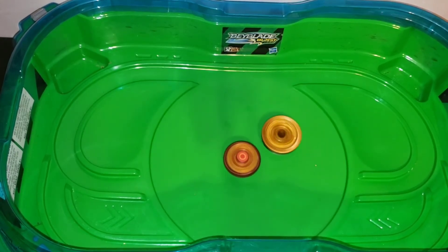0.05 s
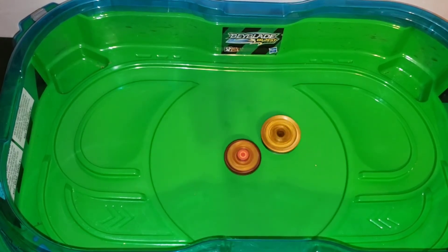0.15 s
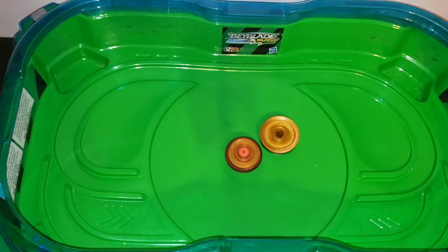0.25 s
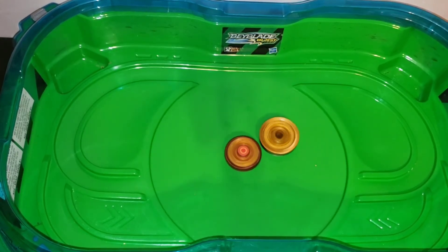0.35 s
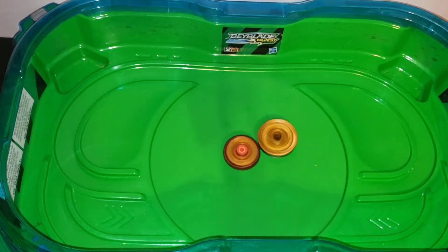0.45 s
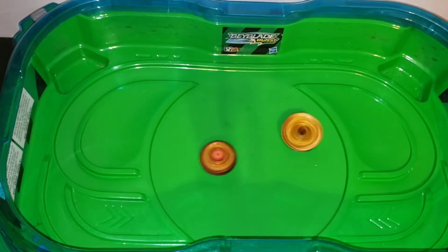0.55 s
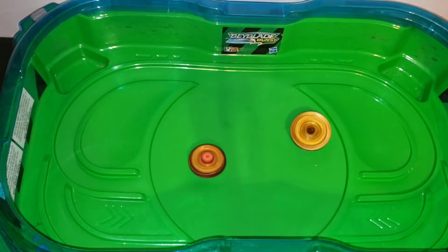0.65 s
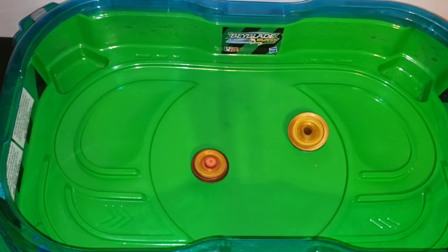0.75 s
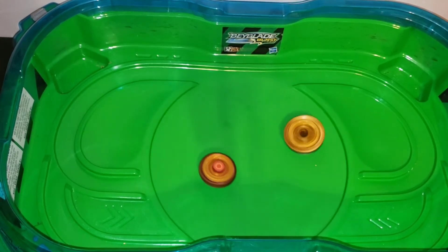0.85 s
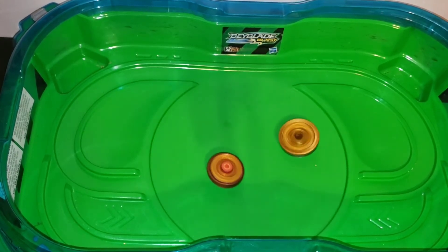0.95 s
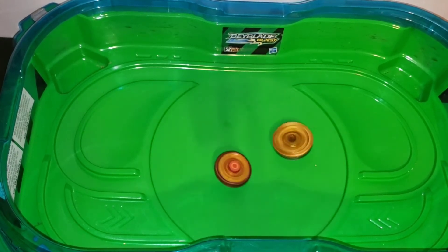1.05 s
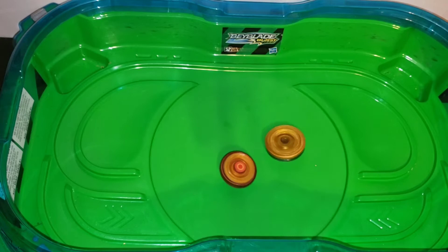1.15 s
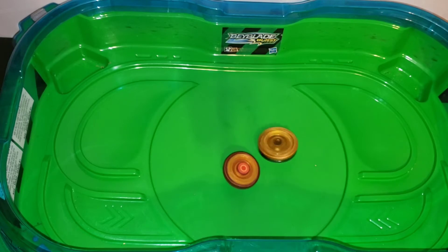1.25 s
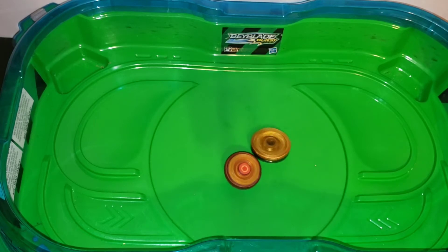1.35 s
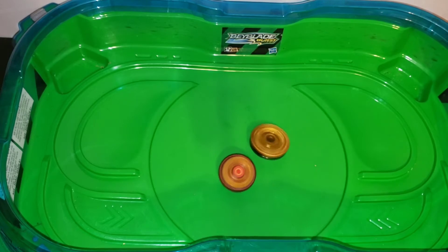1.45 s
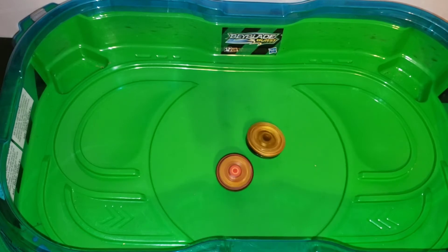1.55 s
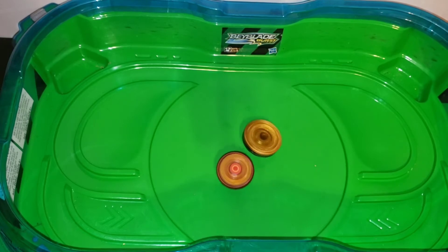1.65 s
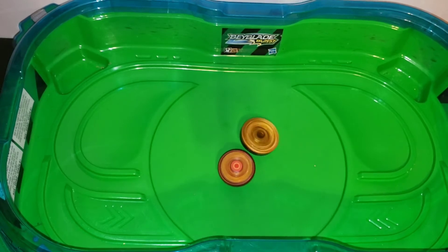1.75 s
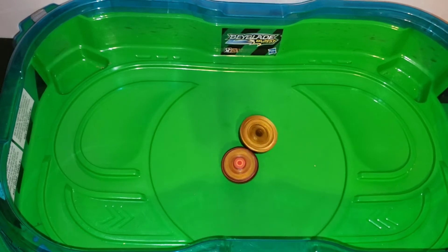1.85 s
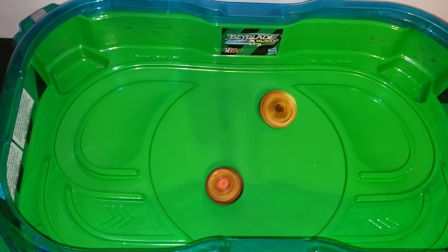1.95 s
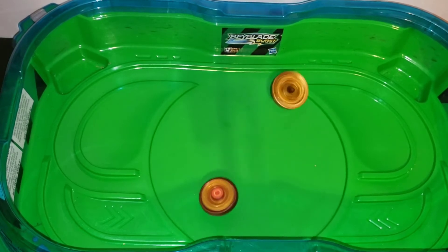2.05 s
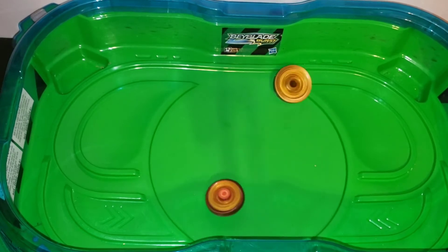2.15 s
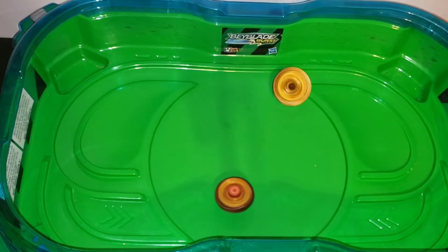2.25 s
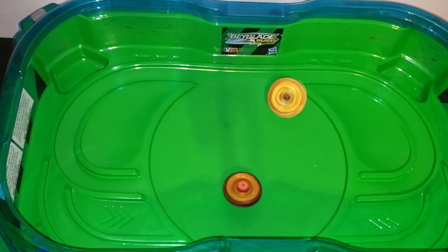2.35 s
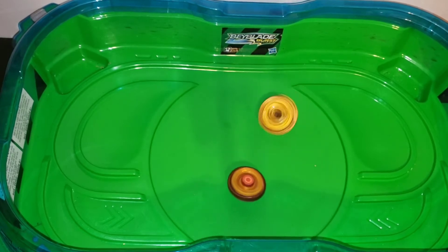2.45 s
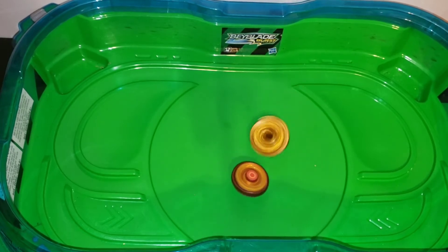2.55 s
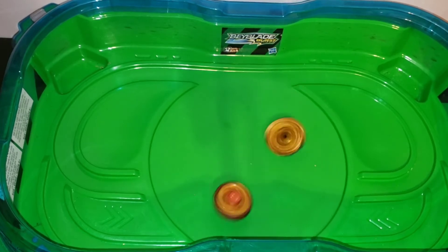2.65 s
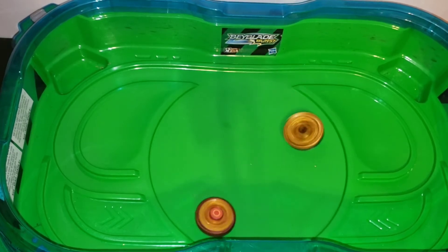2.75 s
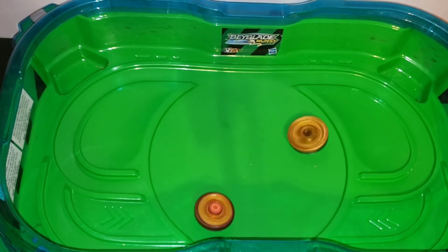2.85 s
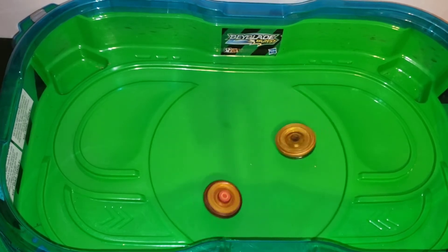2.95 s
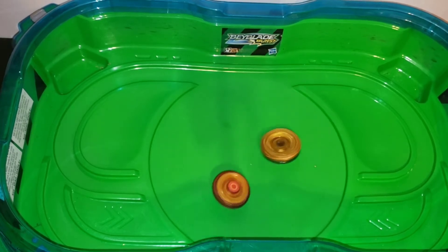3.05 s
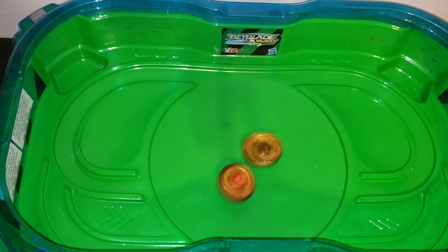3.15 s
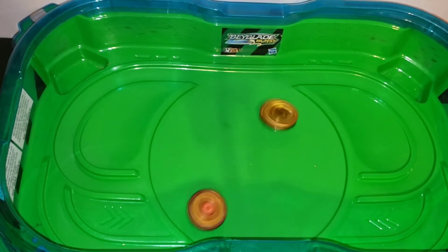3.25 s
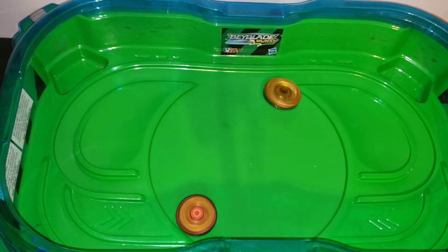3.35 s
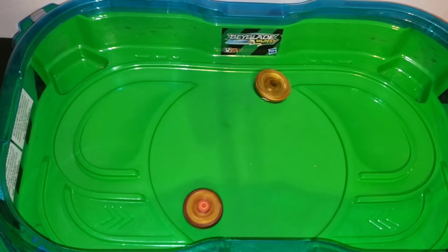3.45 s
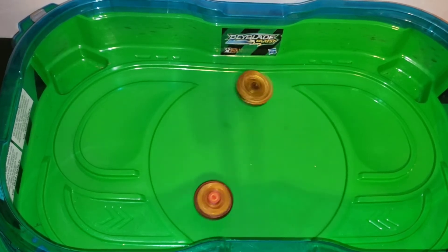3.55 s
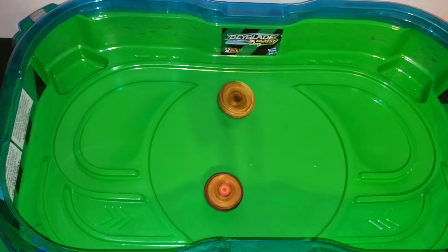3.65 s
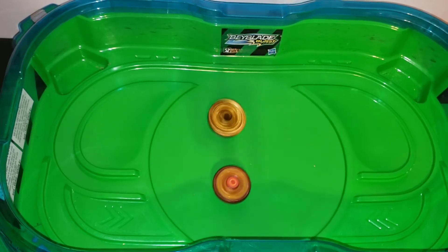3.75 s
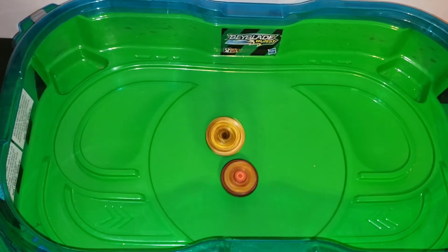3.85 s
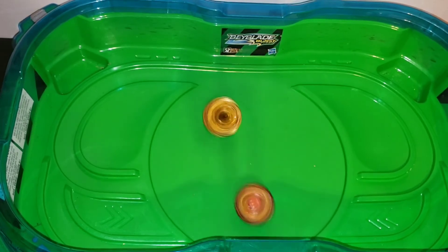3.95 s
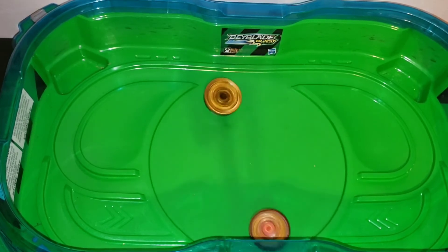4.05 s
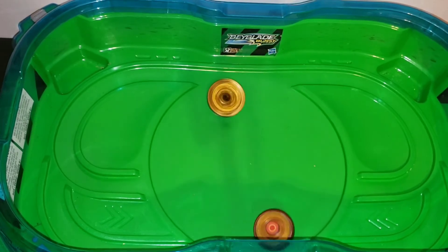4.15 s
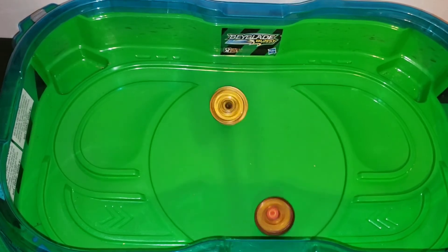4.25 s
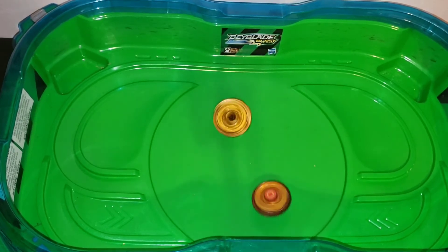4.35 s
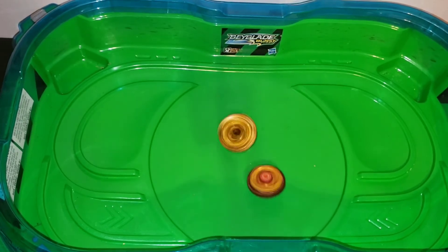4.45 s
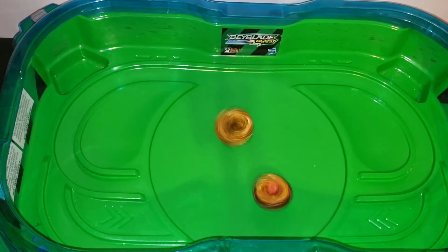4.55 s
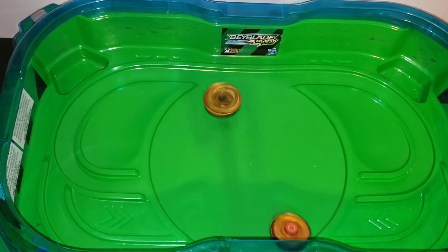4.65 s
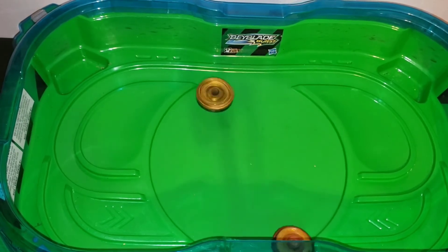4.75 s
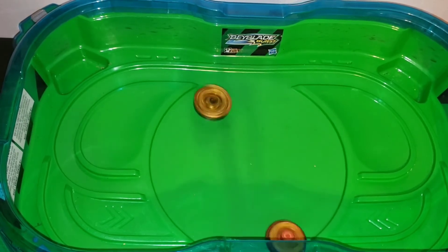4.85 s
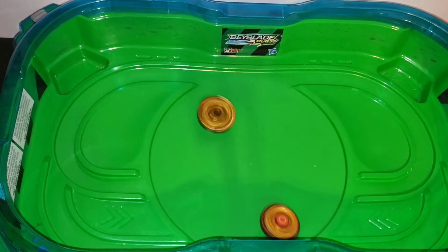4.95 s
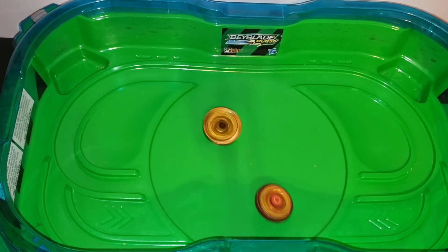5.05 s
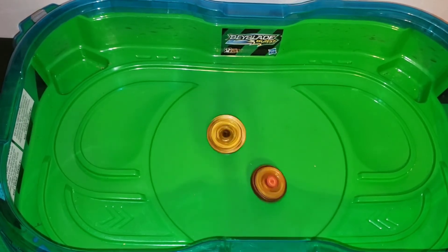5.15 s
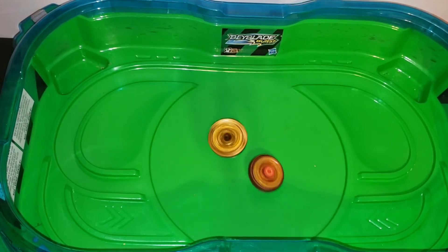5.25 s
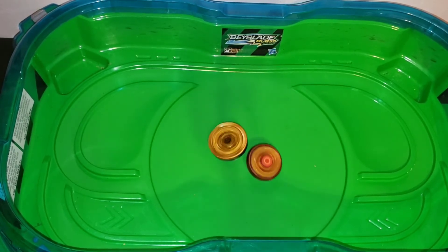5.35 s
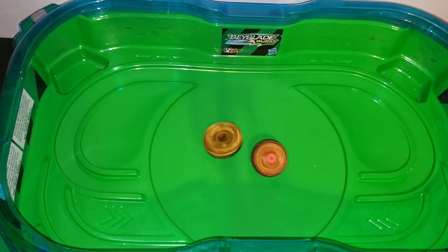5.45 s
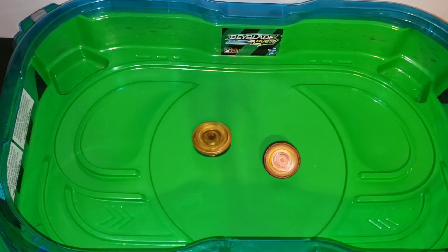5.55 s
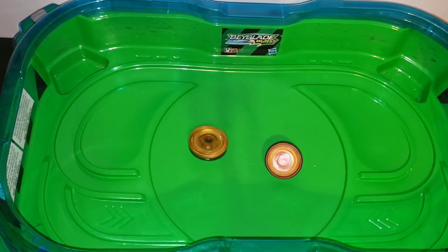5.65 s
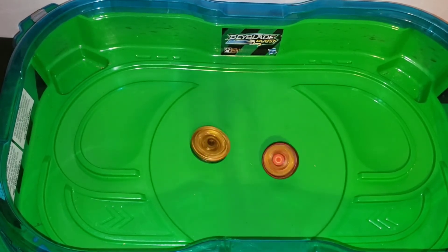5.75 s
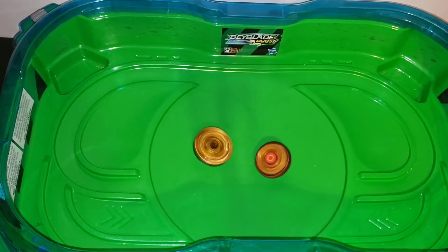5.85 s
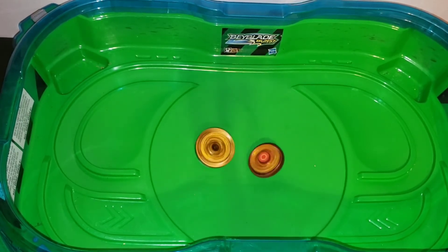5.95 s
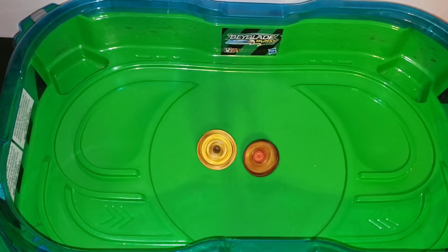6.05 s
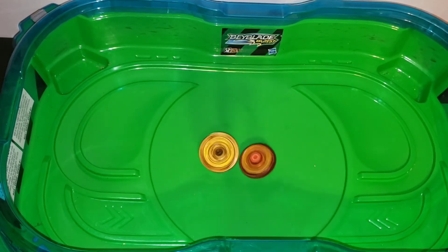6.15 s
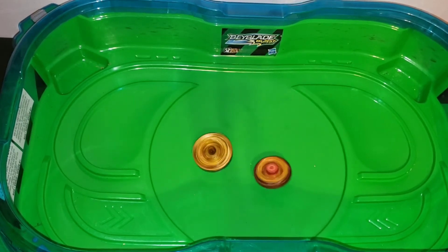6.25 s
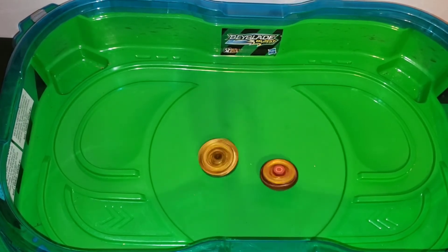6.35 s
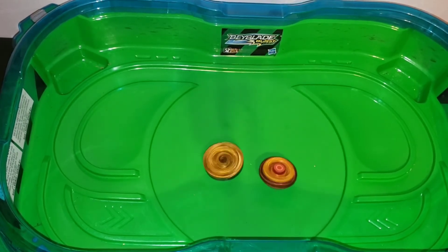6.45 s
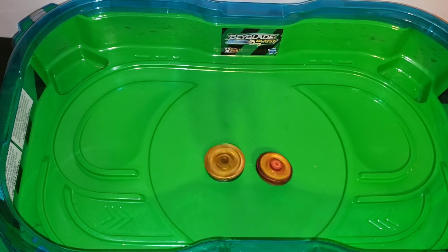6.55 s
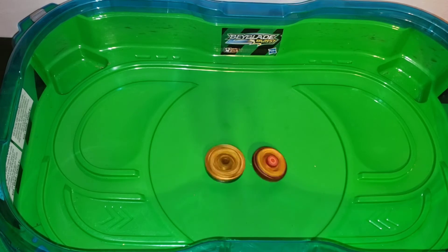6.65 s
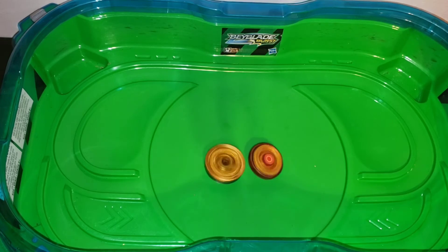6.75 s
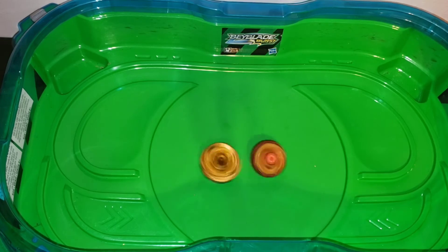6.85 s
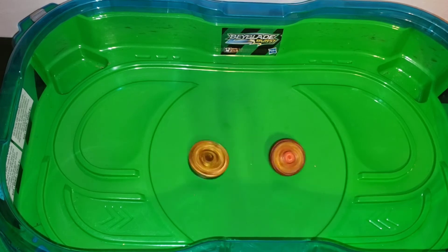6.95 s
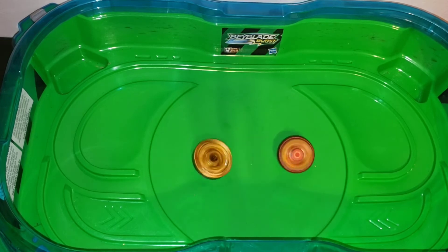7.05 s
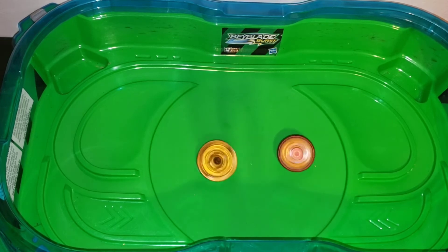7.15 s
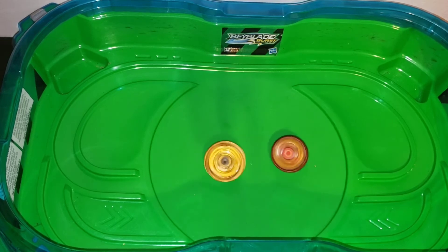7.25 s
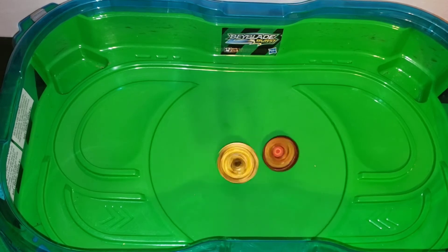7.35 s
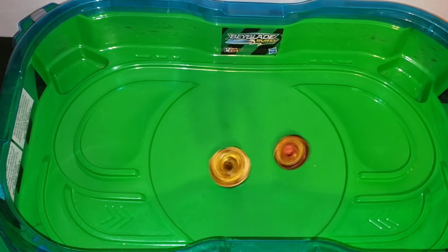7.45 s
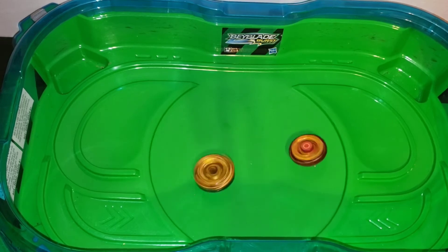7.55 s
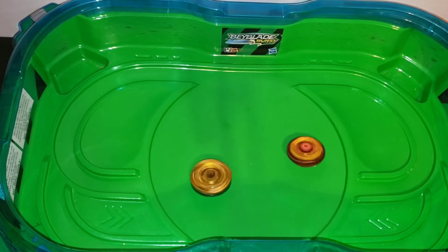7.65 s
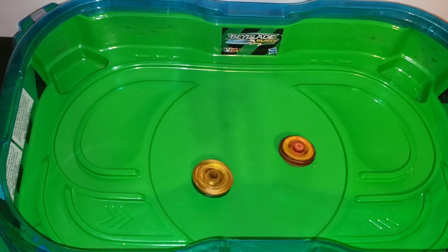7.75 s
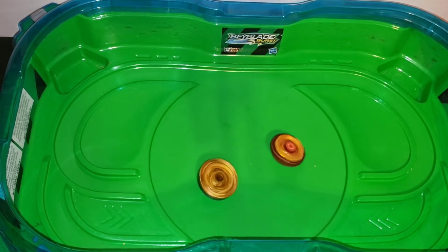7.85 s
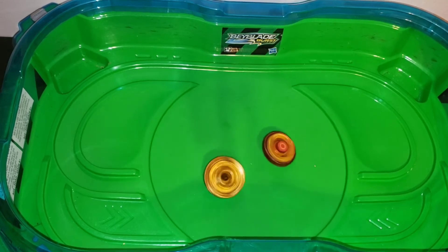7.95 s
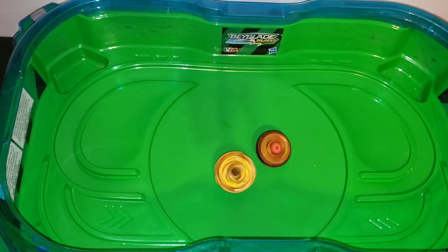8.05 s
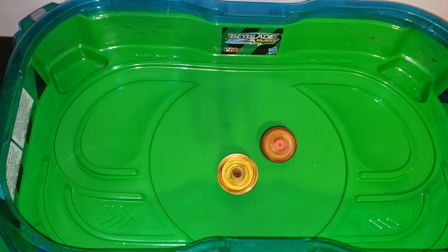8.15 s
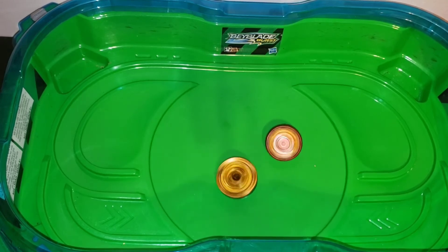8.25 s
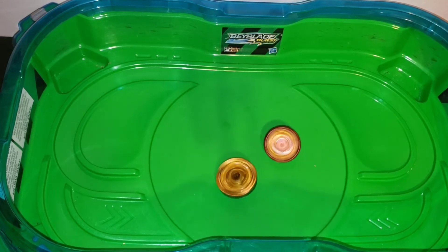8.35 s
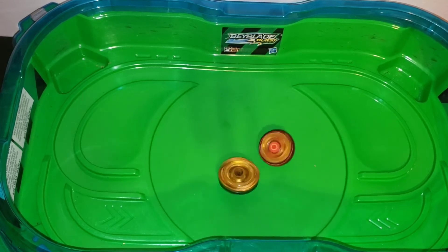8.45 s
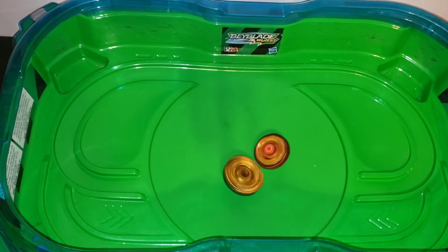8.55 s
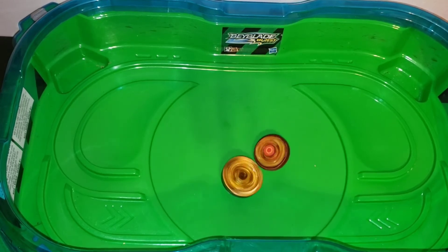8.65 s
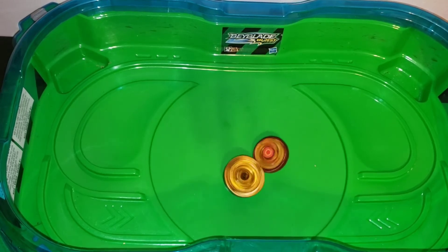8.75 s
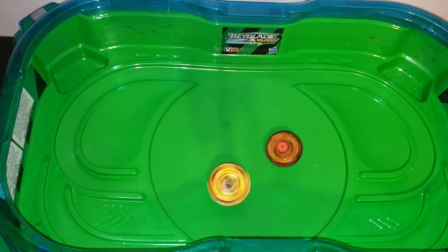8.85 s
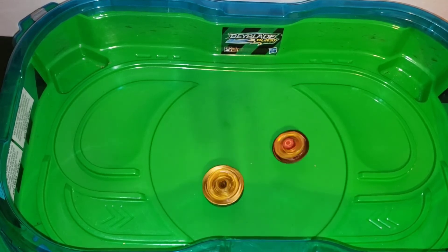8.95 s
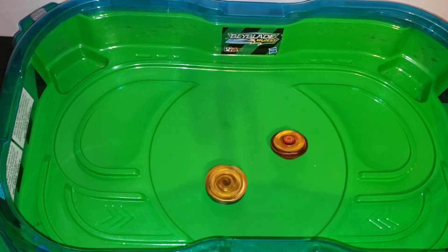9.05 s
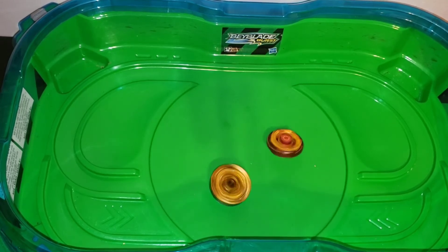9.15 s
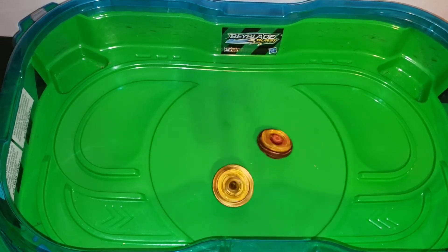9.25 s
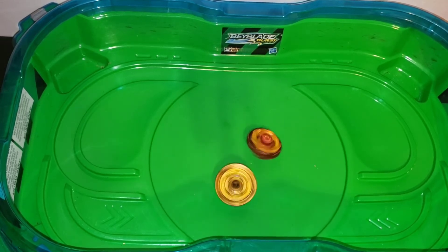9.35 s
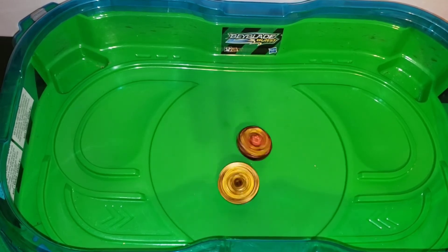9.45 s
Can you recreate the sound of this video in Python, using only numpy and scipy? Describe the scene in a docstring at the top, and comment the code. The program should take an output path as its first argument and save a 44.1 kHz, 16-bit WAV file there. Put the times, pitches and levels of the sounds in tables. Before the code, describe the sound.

Sharp ringing clacks and rapid plastic rattles punctuate the steady hum of two toy tops battling in a plastic arena.

```python
"""Sharp clacks, quick drumming and a steady whir: two spinning tops battle in a thin plastic bowl.
Each time their metal rims meet they clack and ring. A tilted top then wobbles and slaps the bowl's
floor until it stands up again. All along, the tops hum because they are a little off balance, and
their tips rub and hiss. A few hard knocks make the plastic boom. It is heard from just above,
in a small room."""
import sys
import numpy as np
from scipy import signal
from scipy.io import wavfile

SR = 44100
rng = np.random.default_rng(int(sys.argv[2]) if len(sys.argv) > 2 else 0)


def master_out(mix):
    """Clip the mix to full scale and print it as 16-bit PCM to the path in sys.argv[1]."""
    frames = np.transpose(np.atleast_2d(mix))
    ceiling = np.clip(frames, -1, 1)
    pcm = np.round(ceiling * 32767).astype(np.int16)
    wavfile.write(sys.argv[1], SR, pcm)


N = 418950
TIME = np.arange(N) / SR
AGE = np.arange(SR // 2) / SR  # seconds since a hit

# Levels in all tables are relative: each layer adds its own gain. rim hits rim: (time [s], level [dB], then on
# top of that level: floor thump [dB], five crack bands [dB], three clinks [dB]; last, lean to the left [left
# louder by 0.4 dB per unit])
RIM_HITS = [(0.3712, -12, -24, -40, -29.5, -4.5, -20, -21.5, -18, -15.5, -11.5, 2),
            (0.5276, -16.5, -13.5, -49, -21, -8, -17, -9.5, -8.5, -3, -9, 0.5),
            (1.429, -12.5, -22, -39, -26.5, -5, -11.5, -12.5, -29, -11.5, -47, 2),
            (1.9237, -9.5, -27, -24, -21, -4, -19.5, -9.5, -16.5, -15, -19, 3),
            (2.6481, -3.5, -27, -30, -13.5, -11, -21.5, -14, -47, -49, -17, 2),
            (3.238, -6, -24.5, -25, -19, -10, -20, -22, -50, -19, -42, 6),
            (3.9829, -11, -24.5, -22, -15, -5, -19.5, -12, -15, -14.5, -16.5, 2.3),
            (4.5978, -11, -11, -13.5, -15.5, -14, -30, -14.5, -89, -31, -16, 7),
            (5.4779, -12, -17.5, -19, -19, -8, -24.5, -18, -34, -19, -16.5, 2.8),
            (6.2187, -23, -38.5, -33.5, -13, -0.5, -21.5, -11.5, -40, -11, -31, 5.5),
            (6.923, -10, -23.5, -28.5, -18.5, -5, -25.5, -17.5, -24, -22, -21, 3.6),
            (7.489, -9, -30.5, -43.5, -26.5, -3.5, -15.5, -13.5, -47, -15.5, -33, 0.5),
            (8.1907, -21, -15, -29, -26, -6, -36, -17.5, -29, -9.5, -19.5, 0.55),
            (8.6404, -14.5, -15, -20, -20.5, -6, -26, -20, -22, -19, -33, 1.5),
            (8.8208, -15.5, -15, -15, -23, -10, -21, -18.5, -24, -21, -37, 2.5)]
# spells of wobbling: (first slap [s], last slap [s], slaps [count], speed-up [share], thump at the start,
# middle and end [dB], then on top of the thump: clatter [dB], scrape [dB], fast hum [dB], slow hum [dB])
WOBBLE_SPELLS = [(0.569, 0.654, 3, 0.018, -36, -43, -37, -3.5, -16, -25.5, -7),
                 (0.692, 0.907, 8, .04, -33.5, -34, -44, 1.5, -13.5, -13, -7),
                 (1.445, 1.749, 10, -0.025, -39.5, -36.5, -39, 3.5, -12, -5, -9.5),
                 (1.981, 2.408, 14, 0.07, -38.5, -34, -51, 4.5, -8, 0.5, -6),
                 (2.696, 2.847, 5, 0.11, -26, -30.5, -31.5, 0.5, -11, -16, -4.5),
                 (3.273, 3.475, 7, 0.081, -36, -35.5, -49, 0, -13.5, -8, -12),
                 (3.574, 3.7, 5, .04, -38, -36, -32, -0.5, -11, -10, -26),
                 (4.145, 4.363, 6, 0, -43, -31, -39.5, 4, -14, -25, -5),
                 (4.646, 4.841, 5, 0.021, -32, -28, -35.5, 7, -9, -24, -1.5),
                 (5.505, 5.844, 8, 0.013, -28.5, -27.5, -29, 1, -4.5, -9, -8.5),
                 (5.908, 5.949, 2, 0, -33.5, -53, -35.5, 0, -0.5, -14.5, -3.5),
                 (6.234, 6.37, 4, .1, -24, -28, -32, 3, -7, -17, -15.5),
                 (6.97, 7.114, 4, 0.072, -29, -26.5, -38, 3, -3, -17, -14),
                 (7.154, 7.212, 3, -0.39, -30.5, -37.5, -30, 0.5, -1.5, -22, 0),
                 (7.504, 7.593, 3, 0, -25.5, -23, -29, -0.5, -9.5, -31, -16),
                 (7.957, 8.007, 2, 0, -40.5, -40, -49, -1, 1.5, -23, -10),
                 (8.286, 8.334, 2, 0, -37, -39, -56, 1, 0, -24, -5),
                 (8.368, 8.459, 3, 0.0062, -30.5, -29.5, -36, 0.5, -4.5, -26, -7),
                 (8.532, 8.612, 3, -0.015, -34, -39, -34.5, -2.5, -2.5, -22, -8),
                 (8.674, 8.771, 3, 0, -33, -33, -33.5, 3.5, 0, -7, -12),
                 (8.863, 8.926, 2, 0, -25.5, -41, -29.5, -2.5, -7.5, -22, -15),
                 (9.076, 9.13, 2, 0, -47.5, -52, -65, -3, 4.5, -22, -4),
                 (9.16, 9.248, 3, -0.014, -37, -33, -37, 1.5, -1, -24, 2),
                 (9.332, 9.48, 4, -0.011, -32, -39, -32, 2, -4.5, -8, -3.5)]
# higher notes of the bowl's floor: (pitch [Hz], level [dB], time to fade by 60 dB [s])
FLOOR_NOTES = [(420, -8, .12), (570, -4, .09), (655, -3, .08), (766, -2, .12), (870, -6, .07),
               (1007, -6, .08), (1150, -6, .1), (1430, -7, .07), (1590, -9, .08), (1900, -9, .07)]
# tone of rattling plastic: (frequency [Hz], level [dB])
CLATTER_TONE = [(150, -8), (240, 5), (330, -3.5), (420, -6), (660, 5.5), (900, -0.5), (1600, -6),
                (2400, -8.5), (3500, -12.5), (6000, -24), (16000, -47.5)]
# tone of a rim scraping plastic: (frequency [Hz], level [dB])
SCRAPE_TONE = [(900, -35.5), (2500, -12), (4000, -5), (7000, -5.5), (8800, -15), (12000, -11),
               (16000, -17.5)]


def rim_clacks():
    """The rims' teeth catch for an instant: a crack, a short ring and a push on the floor."""
    # slices of the crack's sound: (low edge [Hz], high edge [Hz])
    crack_bands = [(700, 2000), (2000, 3300), (4400, 7000), (7000, 8600), (8600, 16000)]
    low, high = np.transpose(crack_bands)
    out = np.zeros((2, N))
    for start, db, thump_db, *bands_db, _, _, _, pan in RIM_HITS:
        snap = even_hit(burst(rise_s=.0005, fall_s=.0014, shared=.75))
        chatter = even_hit(burst(rise_s=.003, fall_s=.012, shared=.45))
        strike = even_hit(snap + amp(-3) * chatter + amp(-5.5) * rim_ring())
        tone_db = np.array(bands_db) + 10 * np.log10(SR / 2 / (high - low))  # spread over each band
        tone = [(150, tone_db[0] - 8), *zip(np.sqrt(low * high), tone_db)]
        tone.insert(3, (3800, (tone_db[1] + tone_db[2]) / 2 - 1))  # a small dip among the clinks
        sides = amp(np.array([[.2], [-.2]]) * pan)
        add(out, start, amp(db - 7.5) * colour(strike, tone) * sides)
        add(out, start, amp(db + thump_db - 2) * floor_thump())
    return out


def rim_ring():
    """Each hit finds new spots on the whirling rims, so their weak notes shift; touching cuts them short."""
    # weak notes of the rims: (pitch [Hz], level [dB], fade time before touching shortens it [s])
    rim_notes = [(2150, -6, .08), (2470, -2, .08), (2665, -1, .12), (3260, 1, .1), (4600, -4, .06),
                 (4860, -2, .08), (6239, -3, .12), (6541, 0, .15), (6993, -1, .15), (7450, -1, .07),
                 (7752, 2, .14), (7924, 0, .17), (9329, -1, .13), (9680, -2, .08), (10490, -3, .12),
                 (11110, -2, .13), (11700, -1, .1), (12500, 0, .15), (13750, -2, .13), (14450, -2, .13)]
    shifts = 1 + .012 * rng.standard_normal(len(rim_notes))
    notes = [(hz * shift, db, .65 * fade_s) for (hz, db, fade_s), shift in zip(rim_notes, shifts)]
    return even_hit(np.array([ring(notes, spread_db=4) for side in range(2)]))


def rim_clinks():
    """After each clack the metal rims ring on; where they met decides which clink is loudest."""
    # three clinks, each a group of close notes: (pitch [Hz], level [dB], fade time [s])
    clink_notes = [
        [(3494, -3, .27), (3535, 3, .06)],
        [(4016, -8, .12), (4110, 1, .055), (4215, -6, .13)],
        [(5400, 1, .055), (5497, -3, .13), (5599, -4, .12)],
    ]
    onset = 1 - np.exp(-AGE / .0007)
    out = np.zeros((2, N))
    for start, db, *_, clink1, clink2, clink3, _ in RIM_HITS:
        for notes, clink_db in zip(clink_notes, (clink1, clink2, clink3)):
            clink = even_hit(np.array([ring(notes, spread_db=1.5) for side in range(2)]))
            add(out, start, amp(db + clink_db - 4.5) * clink * onset)
    return out


def wobble_drumming(spot_count=12):
    """A tilted top slaps the floor once a swing: the plastic booms and rattles, tip ticks, rim scrapes."""
    # tone of the dry click as the tip lands: (frequency [Hz], level [dB])
    tap_tone = [(400, -7), (1200, 3.5), (2800, -3.5), (5000, -6.5), (8000, -19.5), (16000, -20.5)]
    hits, rattles, scrapes = np.zeros((3, 2, N))
    thumps = [floor_thump() for spot in range(spot_count)]
    floor_rings = np.array([even_hit(ring(FLOOR_NOTES, spread_db=4)) for spot in range(spot_count)])
    ticks = tip_ticks(spot_count)
    for start, thump_db, clatter_db, scrape_db, tap_db in slaps():
        spots = rng.integers(spot_count, size=2)
        rattle = even_hit(burst(rise_s=.0007, fall_s=.013, shared=.55))
        scrape = even_hit(burst(rise_s=.001, fall_s=.016, shared=.21))
        click = burst(rise_s=.0002, fall_s=.0012, shared=.7)[:, :SR // 20]
        add(hits, start, amp(thump_db + 1.15) * thumps[spots[0]])
        add(hits, start, amp(clatter_db - 17) * floor_rings[spots])
        add(hits, start, amp(scrape_db - 10.5) * ticks[spots])
        add(hits, start, amp(tap_db) * even_hit(colour(click, tap_tone)))
        add(rattles, start, amp(clatter_db - 9) * rattle)
        add(scrapes, start, amp(scrape_db + 2) * scrape)
    grit = amp(.5 * drift(rate_hz=410))
    return hits + amp(9.5) * colour(rattles, CLATTER_TONE) + amp(-1) * colour(scrapes * grit, SCRAPE_TONE)


def slaps():
    """Gives each slap: (time [s], thump, clatter, scrape, tap [dB]). Many wobbles speed up as they end."""
    quick_swing_s, softer_db_per_s = .033, 949  # slower swings land more softly
    for first, last, count, speed_up, *swell_db, clatter_db, scrape_db, _, _ in WOBBLE_SPELLS:
        swing_s = (last - first) / max(count - 1, 1)
        tap_db = (clatter_db + scrape_db) / 2 - 13 - softer_db_per_s * max(swing_s - quick_swing_s, 0)
        for progress in np.linspace(0, 1, count):
            start = first + (last - first) * (progress + speed_up * progress * (1 - progress))
            db = np.interp(progress, [0, .5, 1], swell_db) + .5 * rng.standard_normal(4)
            yield start, *(db + [0, clatter_db, scrape_db, tap_db])


def floor_thump(push_hz=113, peak_s=.00974):
    """The thin floor gives way under a push, swings about twice and rings on more softly."""
    # low notes of the floor as a drum: (pitch [Hz], level [dB], fade time [s])
    drum_notes = [(39.7, -19, 0.32), (63, -6.5, 0.37), (96, -8, 0.2), (130.05, -3, 0.48),
                  (144.2, -3.5, 0.3), (206, -2, 0.068), (250.1, -8.5, .12)]
    swell = (AGE / peak_s * np.exp(1 - AGE / peak_s)) ** 3.7
    push = -swell * np.cos(2 * np.pi * push_hz * (AGE - peak_s))
    return even_hit(even_hit(push) + amp(-3) * even_hit(ring(drum_notes, spread_db=4.5)))


def tip_ticks(count):
    """A set of ticks; the tip sits a little differently at each jolt, which shifts its pitch."""
    # notes of a jolted tip: (pitch [Hz], level [dB], fade time [s])
    tip_notes = [(2200, -5, .03), (2315, 0, .035), (2365, -2, .025), (2463, 0, .04), (2750, -5, .02)]
    ticks = []
    for shifts in 1 + .018 * rng.standard_normal((count, len(tip_notes))):
        notes = [(hz * shift, db, fade_s) for (hz, db, fade_s), shift in zip(tip_notes, shifts)]
        ticks.append(even_hit(ring(notes, spread_db=2)))
    return np.array(ticks)


def bowl_knocks():
    """A top knocks hard on the stiff part of the bowl: a hollow boom under a dry crack."""
    # hard knocks: (time [s], boom [dB], crack [dB])
    knock_hits = [(0.531, -28.5, -13.5), (4.599, -21.5, -17.5), (6.012, -27.5, -32), (6.06, -17, -24),
                  (6.145, -7, -20)]
    # notes of the stiff plastic: (pitch [Hz], level [dB], fade time [s])
    wall_notes = [(129, -3, .12), (200, -4, .07), (245, -1, .07), (303, 2, .1), (345, -4, .05),
                  (408, 0, .13), (511, -7, .08), (600, -5, .07), (690, -6, .07), (850, -11, .09),
                  (1007, -8, .1), (1095, -13, .1)]
    out = np.zeros((2, N))
    for start, boom_db, crack_db in knock_hits:
        add(out, start, amp(boom_db - 12.5) * even_hit(ring(wall_notes, spread_db=1.2)))
        add(out, start, amp(boom_db - 11) * floor_thump())
        rattle = colour(burst(rise_s=.0028, fall_s=.0067, shared=.8), CLATTER_TONE)
        crack = colour(burst(rise_s=.00022, fall_s=.011, shared=.2), SCRAPE_TONE)
        add(out, start, amp(boom_db - 15) * even_hit(rattle))
        add(out, start, amp(crack_db - 9) * even_hit(crack))
    return out


def whir():
    """Off-balance tops hum through the floor; their tips rub harder once a turn and make it sing."""
    # turns per second: (time [s], fast top [Hz], slow top [Hz])
    spin_speeds = [(0, 68.5, 44), (1.099, 61.6, 42.69), (2.4, 59.9, 44.42), (3.5, 64, 43.2),
                   (5.301, 59.64, 42.94), (9.5, 46.13, 42.2)]
    # tones of the tips' low rumble, middle rub and high fizz: (frequency [Hz], level [dB])
    rumble_tone = [(25, -7.5), (45, -11), (100, 5), (160, 7), (240, -6.5), (330, -14.5), (480, -32.5),
                   (1500, -48.5)]
    rub_tone = [(300, -14.5), (450, -9), (770, 6.5), (1000, -3.5), (2400, -0.5), (4500, -3), (7300, -7),
                (8500, -21), (16000, -28.5)]
    fizz_tone = [(3000, -18), (7500, 1), (9500, -4), (12500, 2), (16000, -6.5)]
    fast_gain, slow_gain, rumble_gain, rub_gain, fizz_gain = whir_gains()
    times, *speeds = np.transpose(spin_speeds)
    spin_hz = [np.interp(TIME, times, hz) * (1 + .01887 * drift(rate_hz=9.7)) for hz in speeds]
    fast_angle, slow_angle = 2 * np.pi * np.cumsum(spin_hz, axis=1) / SR
    fast_wave = np.sin(fast_angle) + .15 * np.sin(2 * fast_angle)
    # three times the slow top's speed lands on a strong note of the floor
    slow_wave = .25 * np.sin(slow_angle) + .86 * np.sin(2 * slow_angle) + np.sin(3 * slow_angle)
    fast_hum = fast_gain * amp(2 * drift(rate_hz=20)) * fast_wave
    slow_hum = slow_gain * amp(3.2 * drift(rate_hz=22)) * slow_wave
    rumble = rumble_gain * amp(5.5) * steady_noise(rumble_tone, shared=1)
    pressure = even_level(amp(.57 * np.sin(fast_angle) + 2.2 * np.sin(slow_angle) + 2 * drift(rate_hz=170)))
    singing = signal.oaconvolve(noise_pair(N, shared=.7), ring(FLOOR_NOTES, spread_db=0)[None], axes=1)
    singing = even_level(singing[:, :N]) * amp(-15 + 4 * drift(rate_hz=6))
    rub = rub_gain * amp(-4 + 3.8 * drift(rate_hz=9)) * (steady_noise(rub_tone, shared=.35) + singing)
    fizz = fizz_gain * amp(-12.5) * steady_noise(fizz_tone, shared=.17)
    return fast_hum + slow_hum + rumble + pressure * (rub + fizz)


def whir_gains(rise_s=.022, settle_s=.018):
    """Gains of (fast hum, slow hum, rumble, rub, fizz): low while upright, swelling with each wobble."""
    # upright tops running on the floor: (time [s], fast hum [dB], slow hum [dB], rub [dB], fizz [dB])
    upright_levels = [(0, -55.5, -66, -75, -57.5), (0.45, -57, -70, -73.5, -57.5),
                      (1.0, -51.5, -67, -62, -55.5), (1.35, -45.5, -60, -59, -61),
                      (1.852, -49.5, -42, -62, -53.5), (2.55, -49.5, -51.5, -56, -52),
                      (3.0, -66, -53, -69, -61), (3.2, -49, -46.5, -53.5, -61), (3.85, -58, -52, -58, -54),
                      (5.15, -61, -75.5, -61.5, -52.5), (5.45, -65, -51, -56.5, -64),
                      (6.4, -48.5, -33.5, -49.5, -85), (6.62, -65.5, -61.5, -70.5, -94.5),
                      (6.85, -66, -55.5, -54, -89), (7.35, -62, -47, -57.5, -74),
                      (7.85, -60, -64.5, -69.5, -86), (8.15, -75, -47, -58.5, -78),
                      (9.5, -54, -52.5, -53.5, -81)]
    times, *columns = np.transpose(upright_levels)
    fast, slow, rub, fizz = (amp(np.interp(TIME, times, db)) for db in columns)
    gains = np.array([fast, slow, amp(-19) * (fast + slow), rub, fizz])
    for first, last, _, _, *swell_db, clatter_db, scrape_db, fast_db, slow_db in WOBBLE_SPELLS:
        t = np.arange(first - .5, last + .5, 1 / SR)
        tilt = amp(np.interp(t, [first, (first + last) / 2, last], swell_db))
        # the top also leans just before the first slap and just after the last
        tilt *= np.exp(np.minimum(t - first, 0) / rise_s - np.maximum(t - last, 0) / settle_s)
        shares = amp([fast_db, slow_db, -18, clatter_db - 19, scrape_db - 18])
        add(gains, t[0], shares[:, None] * tilt)
    return gains


def room_echo(sound):
    """Sound bounces off the bowl and close walls; each pitch range fades at its own speed."""
    # how long the echo lasts: (frequency [Hz], time to fade by 60 dB [s])
    fade_times = [(100, 0.49), (300, 0.4), (700, 0.2), (1800, 0.29), (4500, .34), (12000, 0.25)]
    # tone of the echo: (frequency [Hz], level [dB])
    echo_tone = [(60, -23), (150, -11), (350, 2), (900, 2), (3000, -2), (6000, -7.5), (14000, -2)]
    # how alike the left and right echoes are: (frequency [Hz], likeness [0 to 1])
    likeness = [(150, 1), (350, 0.98), (700, 0.4), (1500, 0)]
    bounces = rng.standard_normal((2, len(AGE))) * np.clip((AGE - .003) / .0017, 0, 1)
    hz, t, (left, other) = signal.stft(bounces, SR, nperseg=256)
    alike = np.clip(look_up(likeness, hz), 0, 1)[:, None]
    right = alike * left + np.sqrt(1 - alike ** 2) * other
    fade_s = look_up(fade_times, hz)[:, None]
    fade = np.exp(-np.log(1000) * t / fade_s)
    fade *= np.sqrt(2 * np.log(1000) / (fade_s * SR))  # same energy however long it lasts
    _, tail = signal.istft(np.array([left, right]) * fade, SR, nperseg=256)
    return signal.fftconvolve(sound, colour(tail, echo_tone), axes=1)[:, :N]


def room_air():
    """The faint, low hush of the room."""
    # tone of the hush: (frequency [Hz], level [dB])
    air_tone = [(25, 9), (60, 13.5), (150, 25.5), (300, 13), (500, -3), (2000, -4), (4400, 0.5),
                (5200, 4.5), (7400, 0), (8400, -13), (16000, -2.5)]
    return amp(-64.5) * steady_noise(air_tone, shared=.76)


def ring(notes, spread_db):
    """A struck thing's fading notes; the spot that is hit makes each a bit louder or softer."""
    hz, db, fade_s = np.transpose(notes)[:, :, None]
    db = db + spread_db * rng.standard_normal(db.shape)
    sign = (-1) ** np.arange(len(hz))[:, None]
    fade = np.exp(-np.log(1000) * AGE / fade_s)  # 60 dB down after fade_s
    return (sign * amp(db) * fade * np.sin(2 * np.pi * hz * AGE)).sum(0)


def burst(rise_s, fall_s, shared):
    """A flurry of tiny touches that swells and dies away."""
    return noise_pair(len(AGE), shared) * (1 - np.exp(-AGE / rise_s)) * np.exp(-AGE / fall_s)


def noise_pair(count, shared):
    """Left and right white noise; shared runs from 0 (unrelated) to 1 (the same)."""
    noise = rng.standard_normal((3, count))
    return np.sqrt(shared) * noise[2] + np.sqrt(1 - shared) * noise[:2]


def steady_noise(tone, shared):
    """Noise with the given tone, at an average level of 1."""
    return even_level(colour(noise_pair(N, shared), tone))


def drift(rate_hz):
    """A random wander, at an average level of 1."""
    points = rng.standard_normal(int(TIME[-1] * 400))
    return even_level(np.interp(TIME * rate_hz, np.arange(len(points)), points))


def colour(sound, tone, size=4096):
    """Filters a sound to the given tone, so that nothing is heard ahead of a hit."""
    log_gain = np.log(amp(look_up(tone, abs(np.fft.fftfreq(size, 1 / SR)))))
    response = np.exp(np.conj(signal.hilbert(log_gain)))  # minimum phase
    taps = np.fft.ifft(response).real[:size // 2]
    return signal.oaconvolve(np.atleast_2d(sound), taps[None], axes=1)[:, :sound.shape[-1]]


def look_up(table, hz):
    """Reads between a table's rows on a log-frequency scale."""
    row_hz, values = np.transpose(table)
    return np.interp(np.log(hz + 1), np.log(row_hz + 1), values)


def amp(db):
    """Turns decibels into a gain."""
    return 10 ** (np.asarray(db) / 20)


def even_level(sound):
    """Scales to an average (rms) level of 1."""
    return sound / np.sqrt(np.mean(sound ** 2) + 1e-20)


def even_hit(sound):
    """Gives a short sound the energy of 20 ms at level 1."""
    return sound / np.sqrt(np.sum(sound ** 2, -1, keepdims=True) / (SR / 50) + 1e-20)


def add(mix, start_s, sound):
    """Mixes a sound in at the given time."""
    part = mix[:, max(round(start_s * SR), 0):][:, :sound.shape[-1]]
    part += sound[..., :part.shape[1]]


def scene():
    """The battle, its echo and the quiet room."""
    battle = rim_clacks() + wobble_drumming() + bowl_knocks() + whir()
    clinks = rim_clinks()
    return battle + clinks + room_air() + room_echo(battle + .3 * clinks)


def record(dry):
    """The left microphone hears the bowl a little louder and sooner; deep bass and top treble are cut."""
    # how much louder the left side is: (frequency [Hz], left minus right [dB])
    left_lead = [(60, 5), (110, 3.5), (200, 2.5), (380, 2.5), (700, 2), (1290, 1.5), (2380, 2.5),
                 (4400, -1), (8120, 6.5), (15000, 4.0)]
    left = colour(dry[0], [(hz, db / 2) for hz, db in left_lead])
    right = colour(np.r_[0, dry[1, :-1]], [(hz, -db / 2) for hz, db in left_lead])
    bass_cut = signal.butter(3, 33, "highpass", fs=SR, output="sos")
    treble_cut = signal.firwin(511, 16050, window=("kaiser", 9), fs=SR)
    pair = signal.sosfilt(bass_cut, np.vstack([left, right]))
    return signal.oaconvolve(pair, treble_cut[None], "same", axes=1)


dry = scene()
out = record(dry)
master_out(out)
```